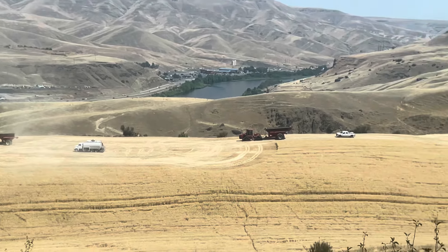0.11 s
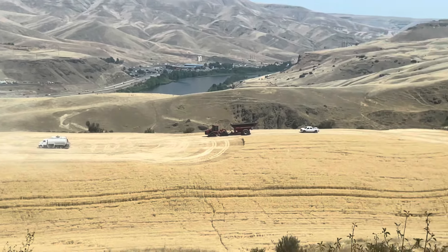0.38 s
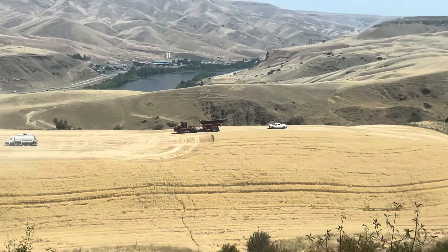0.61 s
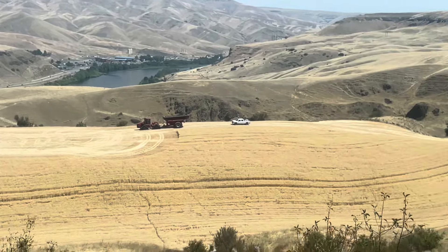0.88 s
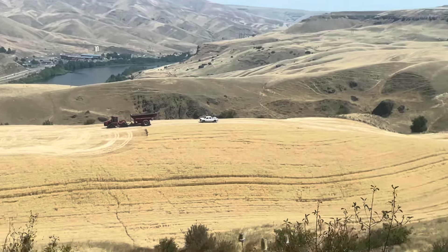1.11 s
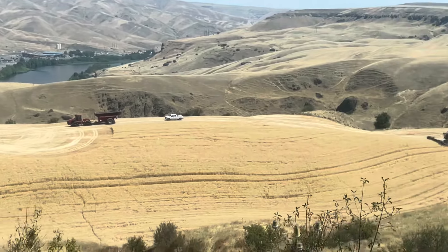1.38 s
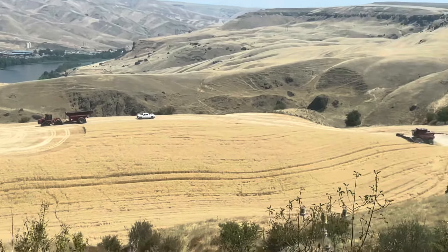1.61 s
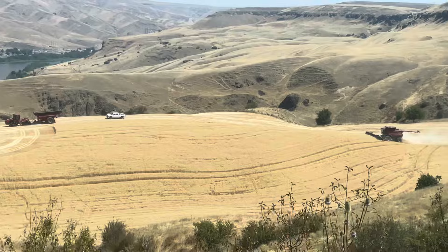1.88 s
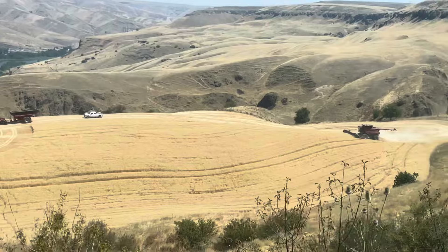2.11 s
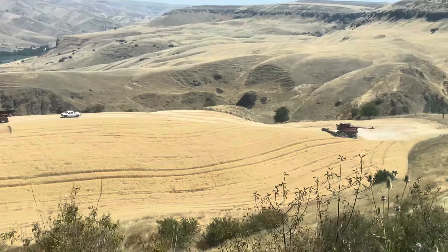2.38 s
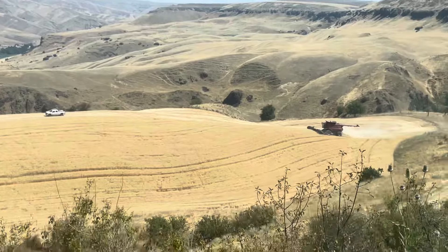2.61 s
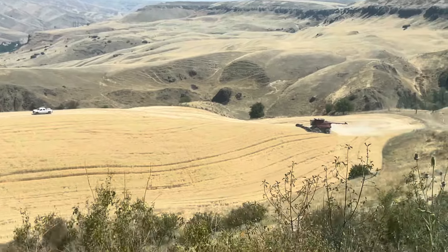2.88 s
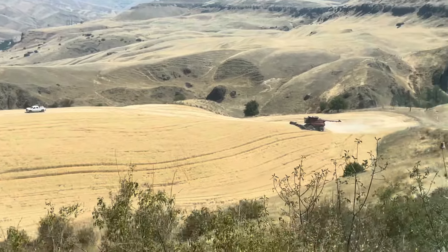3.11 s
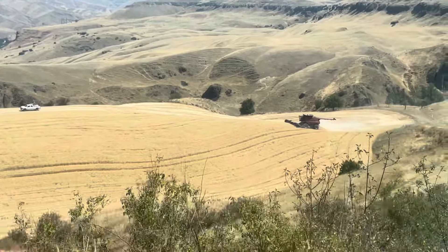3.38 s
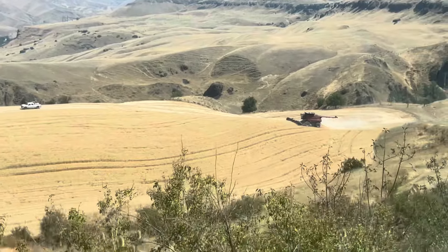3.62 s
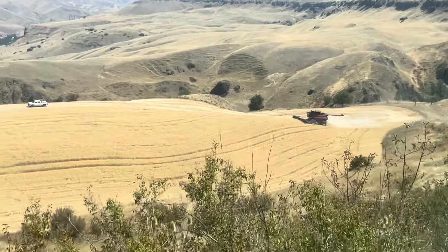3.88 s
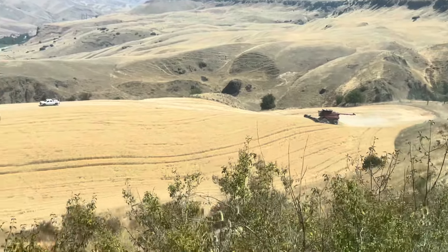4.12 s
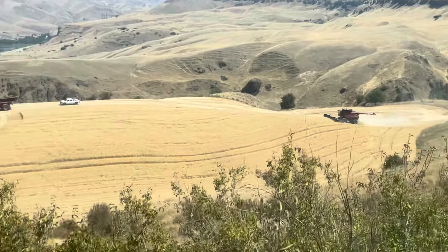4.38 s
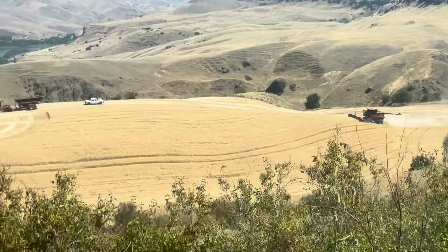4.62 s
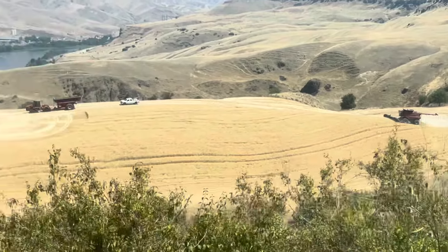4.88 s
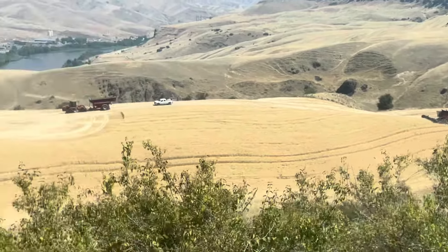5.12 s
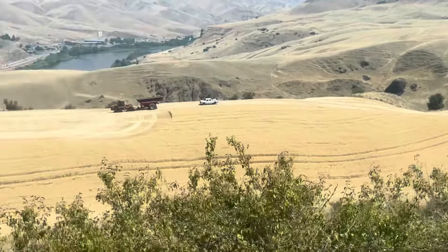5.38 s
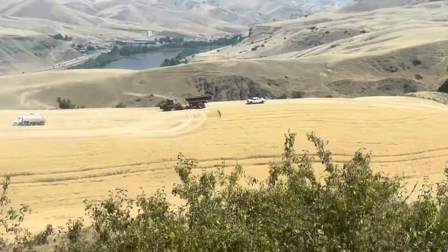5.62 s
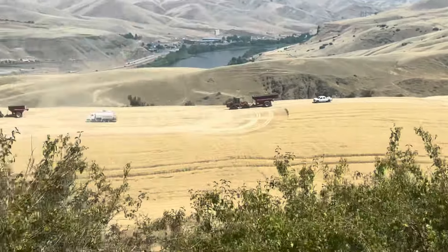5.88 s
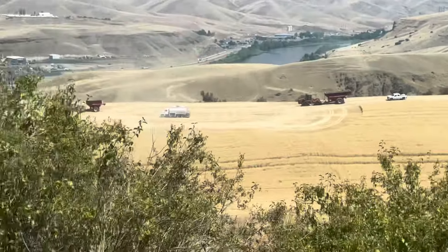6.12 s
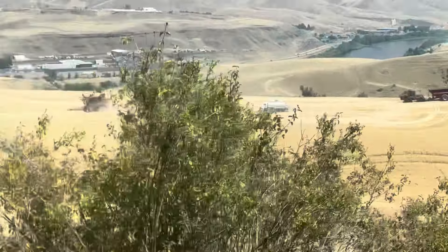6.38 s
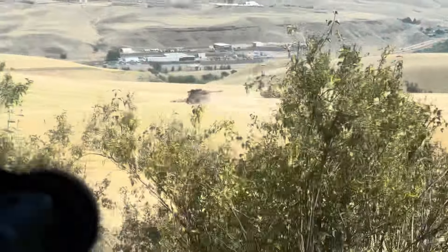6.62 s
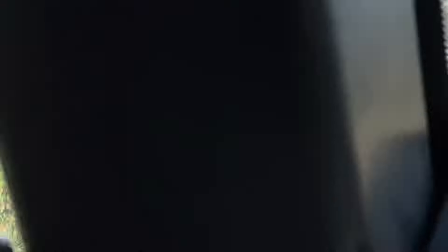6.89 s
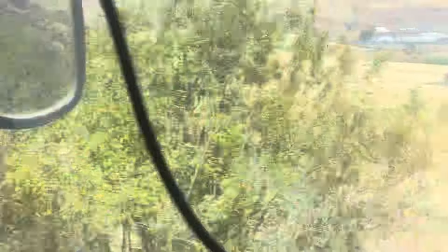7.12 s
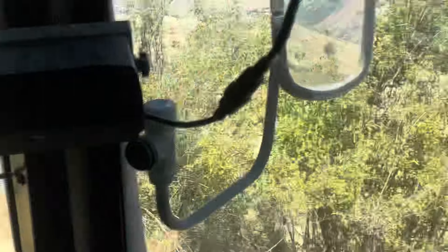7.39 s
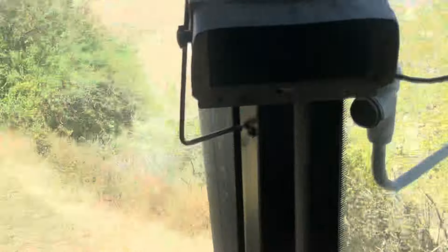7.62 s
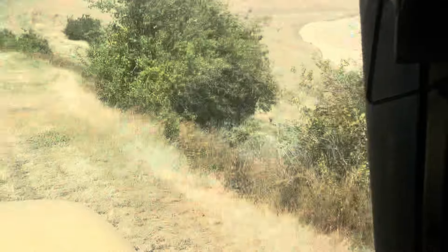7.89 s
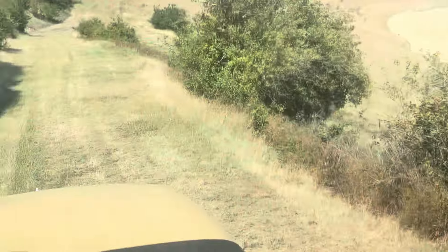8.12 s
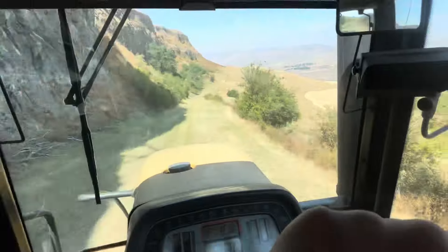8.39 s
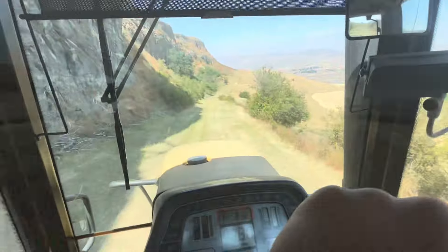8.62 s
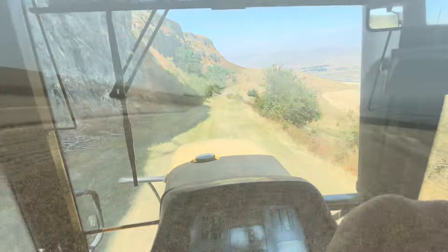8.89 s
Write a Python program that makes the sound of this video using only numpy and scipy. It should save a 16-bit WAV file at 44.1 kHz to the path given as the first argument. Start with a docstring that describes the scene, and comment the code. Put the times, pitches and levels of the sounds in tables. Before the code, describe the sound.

Inside a tractor cab on a dirt track, a six-cylinder diesel drones low and steady with clatter, thin hiss and wavering gear whines. Trim rattles and dull frame knocks come over bumps early on. A pump whine swells mid-way. As the hand-held stereo microphone swings to the front, at about seven and a half seconds, harsh draught thuds and crackles over everything, then eases into the drone.

```python
"""A six-cylinder tractor diesel drones steadily, heard inside the cab on a dirt track: sine tones plus clatter and hiss.
Gears and pumps whine as sines on a shaft that surges slightly. Singing panels and the low roar are shaped noise.
Trim rattles are short noise bursts, frame knocks are dull rings, and the draught is gusty noise with sharp slaps.
A hand-held microphone pair pans along the side window and back through the cab's standing waves, then swings
to the front through the draught; after that most of the engine, roar and trim noise differs from side to side."""
import sys
import numpy as np
from scipy import signal
from scipy.fft import rfft, irfft, next_fast_len
from scipy.io import wavfile
from scipy.ndimage import uniform_filter1d, map_coordinates

SR = 44100
rng = np.random.default_rng(int(sys.argv[2]) if len(sys.argv) > 2 else 0)


def transcribe(signal):
    """Save signal, clipped to [-1, 1], as a 16-bit WAV file at the path in sys.argv[1]."""
    frames = np.atleast_2d(signal).T
    limited = np.clip(frames, -1, 1)
    pcm = np.round(limited * 32767).astype(np.int16)
    wavfile.write(sys.argv[1], SR, pcm)


def voltage_ratio(decibels):
    """Convert decibels (scalar or array-like) to amplitude ratios, 20 dB per decade."""
    exponent = np.asarray(decibels, float) / 20
    return 10 ** exponent


N = 396880  # length in samples

FIRING_HZ = 69.16
# The firing tone, one row per heading in FACING. Each row: left dB, right dB, left lead in radians.
FIRING = [(-42.5, -43, .5), (-45.5, -39, .3), (-39, -33.5, -0.17), (-29.5, -25.5, -0.19),
          (-28, -24, -0.046), (-29.5, -26, -0.059)]
# Tones tied to the crank. Each row: multiple of the firing rate, level in dB against the firing tone.
CRANK = [(.5, -24), (1, 0), (4 / 3, -9), (2, -6.5), (3, -19)]
# Shafts and fans booming in the cab. Each row: pitch in Hz, left dB, right dB.
SHAFTS = [(18.8, -46, -42), (27.9, -52, -43), (40.5, -35.5, -35), (53, -45, -39.5), (58.7, -42, -40.5),
          (241.5, -55, -54)]
# Engine clatter and air. Each row: time in seconds, growl dB, clatter dB, hiss dB.
AIR = [(0, -36.5, -46.5, -55), (2.3, -38.5, -48.5, -55.5), (5, -39, -48, -56), (7, -37, -48, -55.5),
       (7.4, -34.5, -44.5, -50.5), (7.7, -34.5, -44, -47.5), (8.1, -33.5, -43.5, -46.5),
       (8.4, -35, -42.5, -49), (8.6, -35.5, -43.5, -50), (8.8, -37, -46.5, -52), (9, -39, -47.5, -53)]

# One block per whine, one row per heading in FACING. Each row: left dB, right dB, left lead in radians.
WHINES = [
    [(-47, -47, -1.4), (-37, -32, 0.074), (-41, -31, 0.058), (-33.5, -28.5, 0.34), (-34, -27, -0.054),
     (-32.5, -27.5, -0.029)],
    [(-47, -43, 0), (-33.5, -36, 0.5), (-40, -37, -2.5), (-40.5, -33, 0.5), (-37, -33, 0.84),
     (-37, -33.5, -0.6)],
    [(-38, -37.5, -6.5), (-34, -33.5, -5), (-32, -34.5, -6), (-33.5, -36.5, -2), (-40.5, -47.5, -1),
     (-29.5, -32.5, 0)],
    [(-47, -53, -1.5), (-53, -46, 1.8), (-47, -52, 1.8), (-48, -58, -0.5), (-37.5, -57, -2.4),
     (-36.5, -39.5, 0.4)],
    [(-37, -46, -5.5), (-49, -50, 2.5), (-53, -55, 3.5), (-51, -44, 2), (-43.5, -54, 3.5), (-42, -41, -1)],
    [(-35.5, -52, 1.9), (-42, -43, 0.95), (-39, -40, .7), (-39.5, -36.5, 0.69), (-34, -39.5, 0.74),
     (-37.5, -41.5, 0.81)],
    [(-36, -41, -2.5), (-48, -42, 1.6), (-34, -35, 0.9), (-68, -41, 4), (-43, -40.5, 2.5), (-37, -45, 3)],
    [(-51, -48, -0.65), (-62, -61, -1.5), (-46, -51, -0.85), (-66, -59, 0), (-64, -58, 0), (-60, -62, 0)],
    [(-66, -53, -3), (-47, -55, -1.2), (-54, -61, 3), (-55.5, -55, -0.5), (-67, -55.5, 4), (-63, -59, -3.5)],
]
# For each whine: pitch in Hz, unsteadiness of its level in dB, fast phase scatter in radians that smears it.
WHINE_HZ = [164.5, 292.7, 351.6, 380.5, 389.3, 516.5, 586.8, 1410, 1429.6]
WHINE_FLUTTER_DB = [.6, 1.2, 1.6, 3.5, 3.5, 1.7, 2.2, 3, 2.5]
WHINE_ROUGH_RAD = [0, .1, .1, 1.3, 1.3, .15, .2, .7, .3]
# Faint, slightly rough whines with fluttering level. Each row: pitch in Hz, level in dB, left lead in radians.
FAINT = [(339.7, -51, 0), (645, -54.5, 1.3), (702, -59, 0), (886, -52.5, -1.55), (1052, -57.5, 2),
         (1380, -63, 3), (2015, -65.5, 0.5), (2836, -66, -7)]
# A pump whine that swells under load. Each row: time in seconds, level in dB.
PUMP = [(0, -47), (4.1, -60), (4.5, -36), (5.0, -33), (5.2, -38), (5.45, -46), (5.75, -42), (5.9, -34.5),
        (6.3, -33.5), (6.55, -34), (6.75, -46), (7.2, -38.5), (9, -38.5)]
PUMP_HZ = 527.6
PUMP_LEFT_DB, PUMP_LEAD_RAD = 0.5, 0.79  # left side against right
# A narrow band of noise at a higher tone of the pump, swelling with it: pitch in Hz, width in Hz.
PUMP_BAND = (790, 9)
PUMP_BAND_DB = -13.5  # against the pump

# Draught on the microphone ports. Each row: time in seconds, low dB, bright dB, opposed part against shared in dB.
DRAUGHT = [(7.4, -53, -38, -3.5), (7.55, -18, -34, -14), (7.7, -19.5, -31, -13), (7.78, -20, -29, -14),
           (7.88, -19, -24.5, -10), (8.0, -21.5, -26.5, -3), (8.12, -19.5, -27.5, -5), (8.24, -19, -26, -1),
           (8.31, -26, -31, 4), (8.38, -18.5, -28.5, 1), (8.5, -20.5, -25, 2.5), (8.7, -36, -32, -2),
           (8.84, -27.5, -28, -2), (9, -21, -52, -5)]
# Sharp slaps of air. Each row: start in seconds, push dB, pitch in Hz, crack dB, cycles to the push's peak.
# The push level is then varied at random on each side.
SLAPS = [(7.556, -10, 120, -25, .5), (7.604, -11, 95, -30, 0.43), (7.633, -6.5, 330, -14.5, 0.7),
         (7.642, -3, 100, -27, 0.43), (7.663, -9, 168, -14, 0.36), (7.690, -6.5, 108, -39, .5),
         (7.702, -22, 333, -10, .8), (7.711, -7, 235, -10, 1.1), (7.746, -24, 1000, -13.5, 1.6),
         (7.7581, 0.5, 149, -11, 0.67), (7.817, -22, 400, -13.5, 0.59), (7.836, -4, 198, -8.5, 0.64),
         (7.855, -10, 90, -33, .5), (7.882, -19, 810, -9.5, 1.3), (7.893, -10, 198, -16, 0.53),
         (7.905, -0.5, 100, -16, 0.31), (7.933, -11, 85, -28, .5), (7.972, -8, 105, -18, 0.33),
         (7.993, -8.5, 105, -26, .7), (8.031, -7, 93.5, -42, 0.73), (8.077, -4, 90, -25, 0.43),
         (8.117, -9.5, 100, -24, .5), (8.198, -6, 69.6, -40, 0.55), (8.21, -22, 300, -15, 0.6),
         (8.217, -2, 149, -26, 0.49), (8.238, -14, 79, -21, 0.55), (8.268, -15, 75, -30, .5),
         (8.339, -21, 300, -15.5, 0.38), (8.462, -9, 130, -20, 0.45), (8.504, -11, 85, -20, .5)]
GUST_DB = 1.2  # random swing of the draught level
CRACK_T60_S, CRACK_RISE_S, CRACK_HZ = 0.057, 0.0017, 368  # fade by 60 dB, rise time, lower edge
SAG_S, SAG_START = 0.015, 1.24  # time to half the starting pitch, start against the listed pitch

# Trim rattles over bumps. Each row: start in seconds, level in dB, body against that in dB,
# fall time in seconds (half the time the fall takes to reach 1/e).
RATTLES = [(0.345, -41.5, -9, 0.01), (0.804, -57, 7, 0.021), (0.9757, -53.5, 9, 0.013),
           (1.086, -50, 1, 0.016), (1.289, -56, 13.5, .015), (1.414, -52.5, 10.5, 0.018),
           (1.588, -42, 2, 0.0093), (1.6, -49.5, 1.5, 0.011), (1.652, -46, 1, 0.011),
           (1.664, -46, 6, 0.0085), (1.682, -43.5, 3.5, 0.016), (1.714, -51.5, -4, 0.028),
           (1.768, -49, 6, 0.0081), (2.352, -49.5, -7, .015), (2.697, -48, -4, .01),
           (3.72, -51.5, -6, 0.016), (4.0494, -51, -4, 0.012), (4.21, -52, -2, 0.013),
           (7.378, -48.5, 11, 0.013), (7.796, -52.5, 11.5, 0.013), (7.926, -44.5, 5, 0.017),
           (8.007, -49, 1, 0.014), (8.061, -43.5, 9.5, 0.017), (8.247, -41, -1, 0.0099),
           (8.478, -48.5, 10, 0.017), (8.53, -47.5, 15, 0.0096), (8.552, -48, 8, .01)]
RATTLE_RISE_S = 0.0029
CHATTER_DB, CHATTER_SPREAD_DB = -64, 8  # softest small rattle, range above it
GRAIN_DB = 2.6  # fast roughness of the rattles
# Thin ticks. Each row: centre in seconds, left peak in dB, pitch in Hz, length in seconds.
TICK = [(3.733, -49, 5300, .02), (8.035, -39, 12600, .008), (8.496, -41, 1800, .012),
        (8.537, -40, 3150, .01), (8.545, -45, 4000, .01)]
# Dull knocks of the cab frame. Each row: start in seconds, level in dB.
KNOCKS = [(0.803, -22), (1.284, -22.5), (1.574, -22), (1.685, -19.5), (2.254, -29)]
# Tones in the frame's ring. Each row: pitch in Hz, level in dB.
FRAME = [(358, 9), (440, 4), (520, 3.5), (630, -3), (750, -7), (900, -10.5)]

# Singing panels. Each row: pitch in Hz, width in Hz.
SINGING = [(1070, 70), (2000, 110), (2580, 130), (2850, 200), (4400, 240)]
# One row per singing panel. Each row: level in dB at each heading in FACING.
SONG = [(-50, -62, -57, -74, -47.5, -47), (-53, -54, -59, -56, -54.5, -77), (-62, -62, -65, -69, -58, -64),
        (-65, -58.5, -62, -76, -62.5, -54), (-59, -67, -63, -62.5, -64, -63.5)]
# Low roar of tyres and cab panels, with the draught's rumble around 7.8 s.
# Each row: time in seconds, upper dB, deep dB.
ROAR = [(0, -34, -26), (1.55, -35, -25), (1.75, -32.5, -18.5), (1.9, -32.5, -26.5), (5.6, -35.5, -25.5),
        (6.8, -37.5, -23.5), (7.05, -38, -27.5), (7.4, -33.5, -23), (7.8, -25.5, -27), (8.3, -40, -35),
        (8.65, -42, -32), (9, -33, -36)]

# Noise colours, rescaled where used. Each row: frequency in Hz, relative dB per Hz.
RUMBLE = [(14, -31), (22, -15), (32, -36), (48, -33), (60, -10), (76, -8), (95, -1.5), (130, -6),
          (160, -7.5), (190, -15.5), (260, -17.5), (310, -23.5), (400, -22.5), (480, -23.5), (560, -21),
          (700, -38), (900, -84)]
CLATTER = [(450, 0.5), (560, 1.5), (700, -1.5), (850, -1.5), (1080, -0.5), (1300, -9), (1600, -14),
           (2000, -20), (2450, -21), (2900, -24), (3500, -26.5), (4400, -33), (5400, -35), (6500, -55)]
HISS = [(3600, -59), (4400, -3.5), (5400, -4.5), (6500, 1), (7300, 0), (8000, 0), (9000, 1), (10500, -1.5),
        (12000, -5), (13000, -16), (13500, -18), (14000, -34), (15500, -58)]
BUFFET = [(15, -33), (25, -10), (59, 8.5), (107, 4), (182, -1), (261, -4), (321, -8), (415, -12),
          (750, -21.5), (1100, -38), (1500, -41.5), (1950, -56), (3300, -120)]
TRIM = [(800, -33), (1800, -31), (3000, 5.5), (5000, 4.5), (8000, 3.5), (11000, 1), (13500, -19),
        (15000, -58)]
PANEL = [(150, -45), (350, 12.5), (900, 5), (2200, 7.5), (3500, 1), (5000, -23)]

# Where the microphone pair points. Each row: time in seconds, degrees to the right.
HEADING = [(0, -1), (1, 2.5), (1.35, 8), (1.6, 16.5), (2, 16), (3, 18), (3.5, 23), (4.03, 18.5), (4.25, 13),
           (4.8, 13.5), (5.5, 11.5), (6, -2.5), (6.75, -17.5), (7.3, -66), (8.4, -89), (9, -98)]
# The headings, in degrees, at which the standing waves are listed.
FACING = [-90, -55, -30, 0, 10, 20]
SWAY_DB, SWAY_RAD = .9, 0.15  # small hand movements shift the standing waves
# Likeness of left and right noise. Each row: frequency in Hz, likeness from 0 to 1.
ALIKE = [(60, .98), (210, .97), (320, .85), (730, .55), (1200, .6), (1700, .82), (2100, .99), (3000, .97),
         (4400, .985), (5150, .975), (5600, .9), (8000, .92), (8400, .998), (9300, .996), (9800, .9),
         (12000, .95), (12500, 1)]
# How far the left noise leads. Each row: frequency in Hz, lead in radians.
LEAD = [(0, 0), (300, 0), (600, .7), (1030, 1), (1640, 0), (5200, 0), (5700, -1.2), (7000, -1.1),
        (7600, -2.1), (8150, -2.3), (8400, -np.pi), (9300, -np.pi), (9700, -3.9), (11700, -4.8),
        (12250, -5.2), (12450, -2 * np.pi)]
TURN_S = 8.26
# Noise colour after the turn, one list for left and one for right. Each row: frequency in Hz, level in dB.
TURNED = ([(1500, 3), (2500, 2), (5500, 1), (6400, 5.5), (7000, -2), (7600, -2), (9500, -9), (11000, 1),
          (13000, 1.5)], [(1500, 4), (2500, 4), (5500, 0), (6400, 0), (7000, -6), (7600, -4), (9500, -10),
          (11000, 0), (13000, 5)])


def engine():
    """Crank and shaft tones are clean sines; growl and clatter swell slightly with each firing."""
    left, right, lead = by_heading(FIRING)
    fire = 2 * np.pi * FIRING_HZ * drive_time(surge=.003)
    boom = sum(hum(k * fire, left + db, right + db, lead, flutter_db=.8) for k, db in CRANK)
    shaft = 2 * np.pi * drive_time(surge=.003)
    boom += sum(hum(hz * shaft, left_db, right_db, 0, flutter_db=2.5) for hz, left_db, right_db in SHAFTS)
    growl_db, clatter_db, hiss_db = curves(AIR)
    noise = rush(CLATTER, patchy_db=1.2)
    low = filtered(noise, lambda hz: 1 / np.sqrt(1 + (hz / 1500) ** 8))
    growl = voltage_ratio(growl_db + 0.19 * wobble(1.7)) * unit(low) * (1 + 0.05 * np.sin(fire))
    clatter = voltage_ratio(clatter_db) * unit(noise - low) * (1 + .04 * np.sin(fire))
    hiss = voltage_ratio(hiss_db + 0.59 * wobble(2.83)) * rush(HISS, patchy_db=1.6)
    return boom + growl + clatter + hiss


def gears():
    """Gear and pump whines are sines that share one slightly surging shaft."""
    turn = 2 * np.pi * drive_time(surge=.0034)
    out = sum(hum(hz * turn + .5 * wobble(22), db, db, lead, flutter_db=3) for hz, db, lead in FAINT)
    for hz, rows, flutter_db, rough in zip(WHINE_HZ, WHINES, WHINE_FLUTTER_DB, WHINE_ROUGH_RAD):
        left, right, lead = by_heading(rows)
        left = left + SWAY_DB * wobble(2.2)
        right = right + SWAY_DB * wobble(2.2)
        lead = lead + SWAY_RAD * wobble(2.2)
        out += hum(hz * turn + rough * wobble(22), left, right, lead, flutter_db)
    load_db, = curves(PUMP)
    left, right = load_db + PUMP_LEFT_DB / 2, load_db - PUMP_LEFT_DB / 2
    return out + hum(PUMP_HZ * turn, left, right, PUMP_LEAD_RAD, flutter_db=3.0)


def draught():
    """Turbulent air on the ports, part shared and part opposed, with slaps that crack brightly and die fast."""
    low_db, bright_db, opposed_db = curves(DRAUGHT)
    low = gusty(264, lumps_db=1.5, low=True)
    bright = gusty(275, lumps_db=2.5, low=False)
    burst = gusty(CRACK_HZ, lumps_db=.8, low=False)
    gust = lambda: GUST_DB * np.array([wobble(15), wobble(15)])
    shared, opposed = voltage_ratio(low_db + gust()) * low + voltage_ratio(bright_db + gust()) * bright
    opposed = voltage_ratio(opposed_db) * opposed
    out = np.array([shared + opposed, shared - opposed])
    t = np.arange(4000) / SR
    for s, db, hz, crack_db, cycles in SLAPS:
        place = slice(round(s * SR), round(s * SR) + len(t))
        # the pitch of the push sags as it swells and fades
        phase = 2 * np.pi * hz * SAG_S * np.log(1 + t / SAG_S) * SAG_START
        age = t * hz / cycles  # 1 at the peak of the swell
        push = np.sin(phase) * (age * np.exp(1 - age)) ** 2
        crack = burst[0, place] * np.minimum(t / CRACK_RISE_S, 1) * voltage_ratio(-60 * t / CRACK_T60_S)
        out[:, place] += voltage_ratio(db + rng.normal(0, 1.2, (2, 1))) * push + voltage_ratio(crack_db) * crack
    return out


def trim():
    """Each rattle is a grainy burst, quick to start; small ones chatter at random; a few thin ticks."""
    t = np.arange(N) / SR
    small = rng.random((50, 2))
    chatter = [(N / SR * when, CHATTER_DB + CHATTER_SPREAD_DB * size, -3, .015) for when, size in small]
    shake, body = np.zeros(N + SR), np.zeros(N + SR)
    u = t[:SR // 5]
    for s, db, body_db, fall_s in list(RATTLES) + chatter:
        envelope = (1 - np.exp(-u / RATTLE_RISE_S)) * np.exp(-(u / (2 * fall_s)) ** 2)
        shake[round(s * SR):][:len(u)] += voltage_ratio(db) * envelope
        body[round(s * SR):][:len(u)] += voltage_ratio(db + body_db) * envelope
    rattle = shake[:N] * rush(TRIM, patchy_db=.7) + body[:N] * rush(PANEL, patchy_db=1.2)
    tick = np.zeros(N)
    for s, db, hz, long in TICK:
        tick += voltage_ratio(db) * np.sin(2 * np.pi * hz * t) * np.exp(-((t - s) / (long / 2)) ** 4)
    return voltage_ratio(GRAIN_DB * wobble(300)) * rattle + tick * [[1], [.5]]  # ticks are half as strong on the right


def knocks():
    """Bumps knock the cab frame: a few sines start together and fade as a short dull ring."""
    out, t = np.zeros(N), np.arange(2500) / SR
    ring = sum(voltage_ratio(db) * np.sin(2 * np.pi * hz * t) for hz, db in FRAME)
    ring *= voltage_ratio(-60 * t / 0.046) * np.minimum(t / 0.0029, 1)  # fades 60 dB in 46 ms, rises in 2.9 ms
    for s, db in KNOCKS:
        out[round(s * SR):][:len(t)] += voltage_ratio(db) * ring
    return out * voltage_ratio([[1.5], [-1.5]])  # left 3 dB above right


def panels():
    """Cab panels sing as narrow bands of noise that vary with heading; one more narrow band, a higher tone of
    the pump, follows the pump's swell."""
    out = 0
    levels = by_heading(np.transpose(SONG)) + [curves(PUMP)[0] + PUMP_BAND_DB]
    for (hz, width_hz), db in zip(SINGING + [PUMP_BAND], levels):
        band = [(hz / 2, -120), (hz - 3 * width_hz, -30), (hz - width_hz / 2, -4), (hz, 0),
                (hz + width_hz / 2, -4), (hz + 3 * width_hz, -30), (hz * 2, -120)]
        out = out + voltage_ratio(db + SWAY_DB * wobble(2.2)) * rush(band, patchy_db=2.5)
    return out


def low_roar():
    """Low noise of tyres, cab panels and, around 7.8 s, the draught; it leans to the firing tone's louder side."""
    left, right, _ = by_heading(FIRING)
    roar_db, deep_db = curves(ROAR)
    roar = rush(RUMBLE, patchy_db=.6)
    deep = filtered(roar, lambda hz: 1 / np.sqrt(1 + (hz / 175) ** 8))
    lean = np.outer([.5, -.5], left - right)  # dB
    upper = voltage_ratio(roar_db + 1.1 * wobble(4.12)) * unit(roar - deep)
    # only the lower end of the upper part leans as well
    upper_low = filtered(upper, lambda hz: 1 / np.sqrt(1 + (hz / 270) ** 8))
    upper = upper + upper_low * (voltage_ratio(lean) - 1)
    return upper + voltage_ratio(deep_db + lean + 0.22 * wobble(4.0)) * unit(deep)


def hum(phase, left_db, right_db, lead, flutter_db):
    """A sine with a level for each side, its strength fluttering."""
    size = np.sqrt(2) * voltage_ratio(flutter_db * wobble(9))  # the root turns rms into peak
    phase = phase + rng.uniform(0, 2 * np.pi)
    left = voltage_ratio(left_db) * np.sin(phase + lead / 2)
    right = voltage_ratio(right_db) * np.sin(phase - lead / 2)
    return size * np.array([left, right])


def drive_time(surge):
    """Seconds as the drive line counts them: its speed surges about three times a second."""
    return np.cumsum(1 + surge * wobble(6.5)) / SR


def rush(spectrum, patchy_db):
    """Patchy stereo noise; the sides share much of it until the turn, then part and change colour."""
    z = signal.stft(rng.standard_normal((2, N)), nperseg=512)[2]
    field = uniform_filter1d(uniform_filter1d(rng.standard_normal(z.shape[1:]), 5, 0), 30, 1)
    pair = signal.istft(z * voltage_ratio(patchy_db * unit(field)), nperseg=512)[1][:, :N]
    a, b = unit(filtered(pair, lambda hz: voltage_ratio(along(spectrum, hz))))
    # before the turn: noise a is common, noise b has opposite signs on the two sides
    mix = lambda hz: np.arccos(np.clip(along(ALIKE, hz), 0, 1)) / 2
    lead = lambda hz: np.exp(np.outer([.5j, -.5j], along(LEAD, hz)))
    shared = filtered(a, lambda hz: np.cos(mix(hz)) * lead(hz))
    own = filtered(b, lambda hz: np.sin(mix(hz)) * lead(hz) * [[1], [-1]])
    # after the turn: a on the left, b on the right, but the top stays common to both
    apart = filtered(np.array([a, b]), lambda hz: voltage_ratio([along(side, hz) for side in TURNED]))
    apart[1] += filtered(apart[0] - apart[1], lambda hz: hz > 12400)
    fade = np.pi / 2 * np.clip((np.arange(N) / SR - TURN_S) / .02, 0, 1)
    return np.cos(fade) * (shared + own) + np.sin(fade) * apart


def gusty(edge_hz, lumps_db, low):
    """Two unrelated air noises below or above an edge, evened out, then made lumpy."""
    slope = lambda hz: 1 / np.sqrt(1 + (hz / edge_hz) ** (6 if low else -6))
    air = filtered(rng.standard_normal((2, N)), lambda hz: voltage_ratio(along(BUFFET, hz)) * slope(hz + 1))
    even = air / np.sqrt(np.abs(uniform_filter1d(air ** 2, 3000)))
    return even * voltage_ratio(lumps_db * np.array([wobble(40), wobble(44)]))


def by_heading(rows):
    """One value per sample for each column of rows listed at the headings."""
    heading, = curves(HEADING)
    return [np.interp(heading, FACING, c) for c in np.transpose(rows)]


def curves(rows):
    """One value per sample for each column after the time."""
    s, *cols = np.transpose(rows)
    return [np.interp(np.arange(N) / SR, s, c) for c in cols]


def wobble(rate):
    """A smooth random curve through rate random points a second."""
    return map_coordinates(rng.standard_normal(int(N * rate / SR) + 4), [np.arange(N) * rate / SR])


def filtered(x, response):
    """Changes the strength and phase of each frequency in x by the given response."""
    m = next_fast_len(N + 8192)
    return irfft(rfft(x, m) * response(np.fft.rfftfreq(m, 1 / SR)), m)[..., :N]


def along(points, hz):
    """Reads a curve of (Hz, value) points on a log frequency axis."""
    f, v = np.transpose(points)
    return np.interp(np.log(hz + 1), np.log(f + 1), v)


def unit(x):
    """Scaled to rms 1."""
    return x / np.sqrt(np.mean(x ** 2) + 1e-20)


def scene():
    """Everything heard in the cab."""
    return engine() + gears() + draught() + trim() + knocks() + panels() + low_roar()


def roll_off(x):
    """The treble ends steeply here."""
    return signal.sosfilt(signal.butter(12, 14190, fs=SR, output="sos"), x)


def record(dry):
    """The microphones lose the deepest bass and round off the highest peaks."""
    x = filtered(dry, lambda hz: (1j * hz / (17 + 1j * hz)) ** 2)
    x = x / (1 + np.abs(x / .95) ** 4) ** .25
    return roll_off(x)


dry = scene()
out = record(dry)
transcribe(out)
```